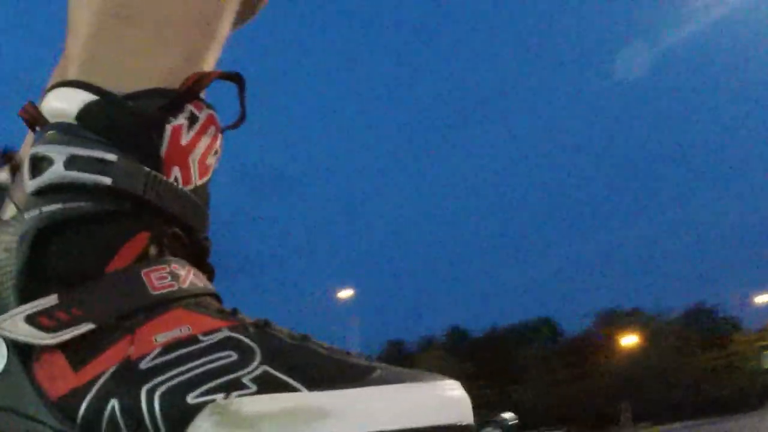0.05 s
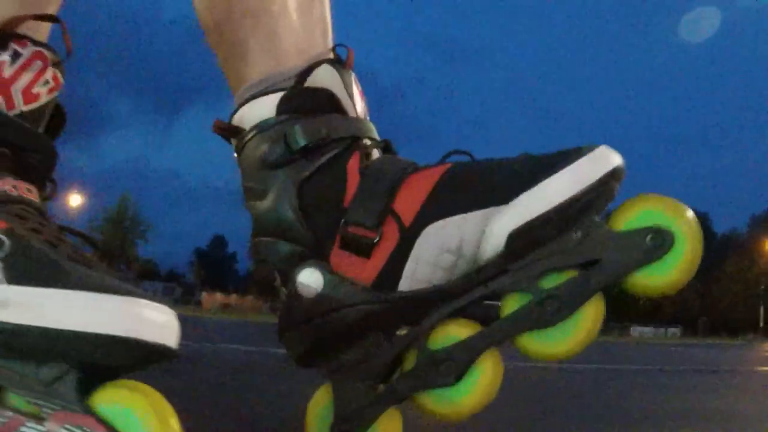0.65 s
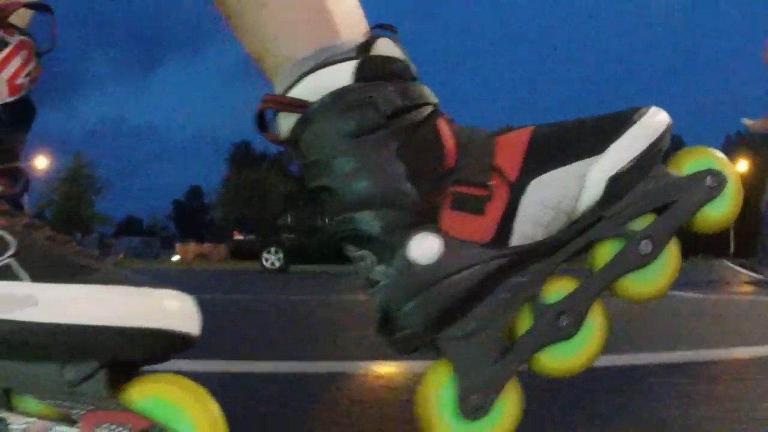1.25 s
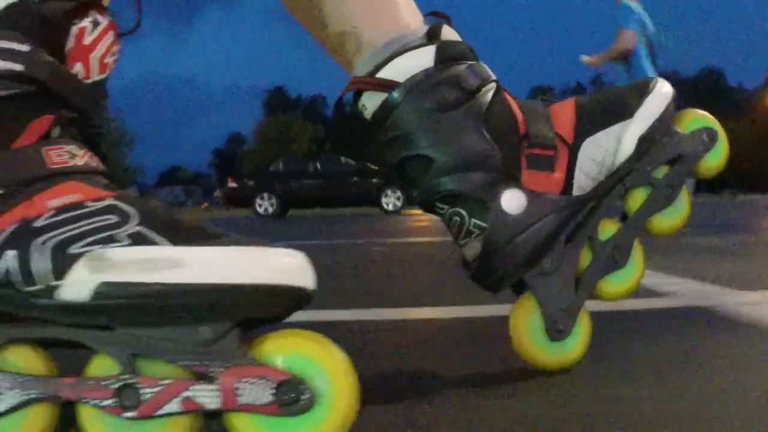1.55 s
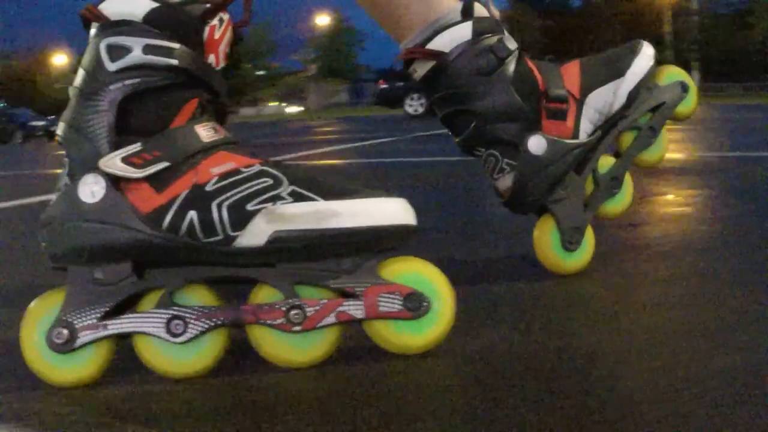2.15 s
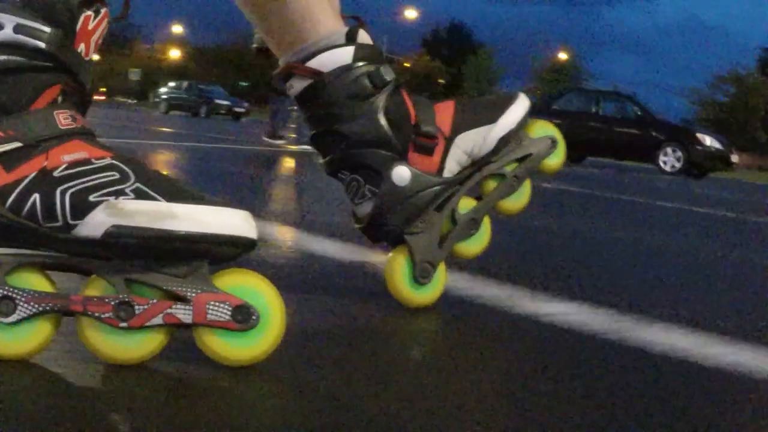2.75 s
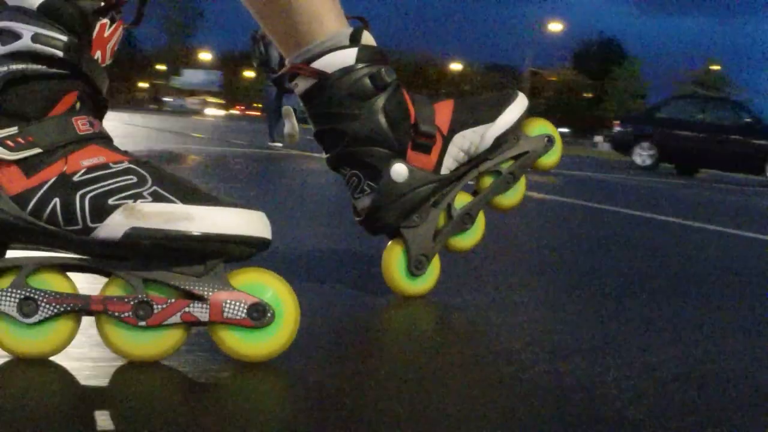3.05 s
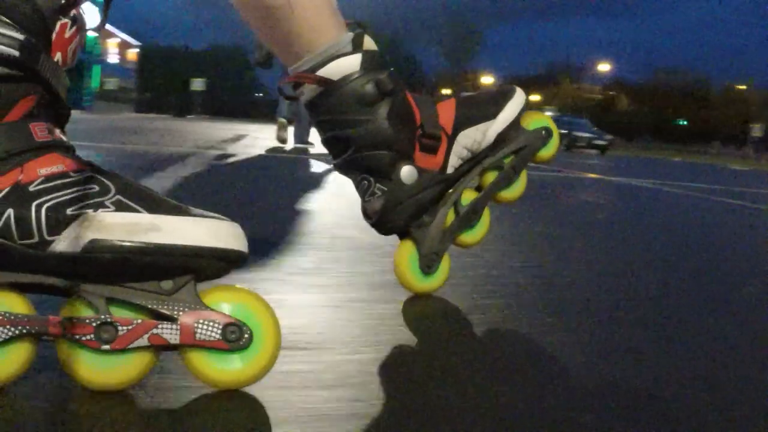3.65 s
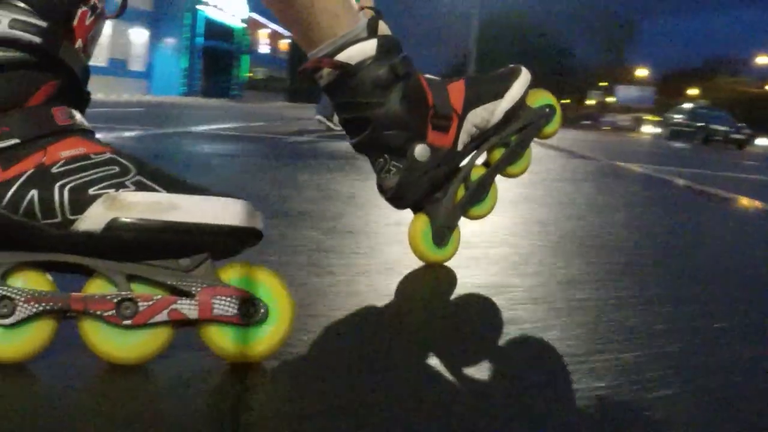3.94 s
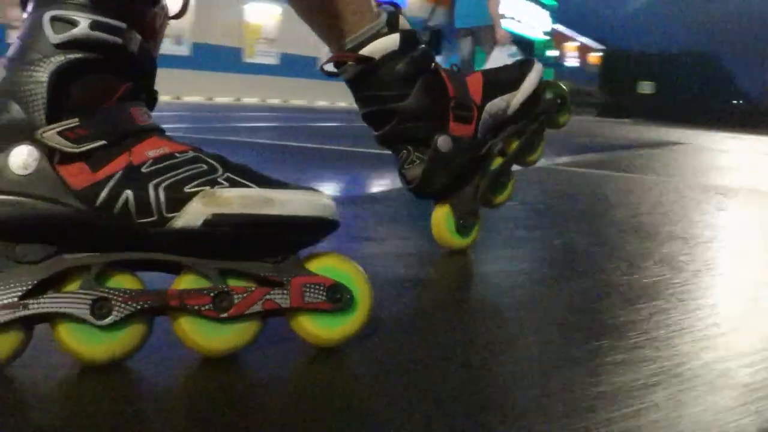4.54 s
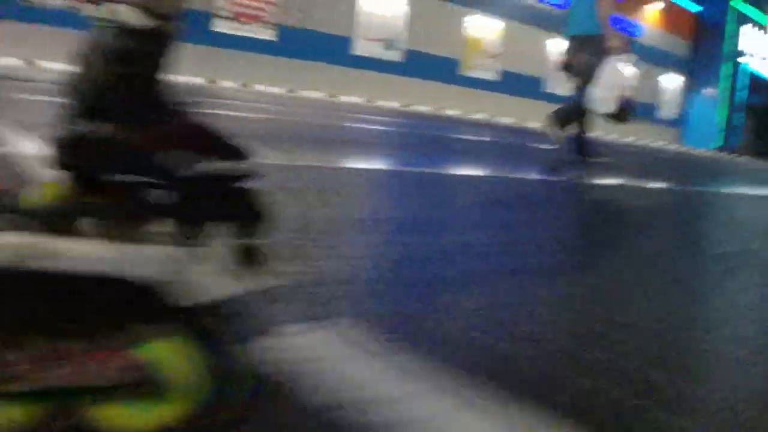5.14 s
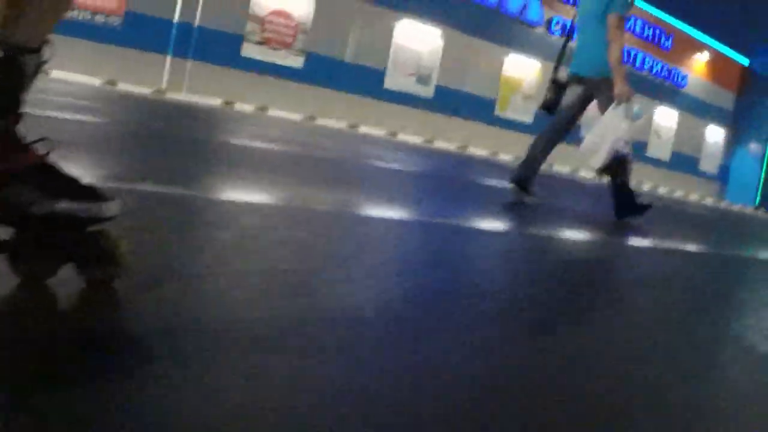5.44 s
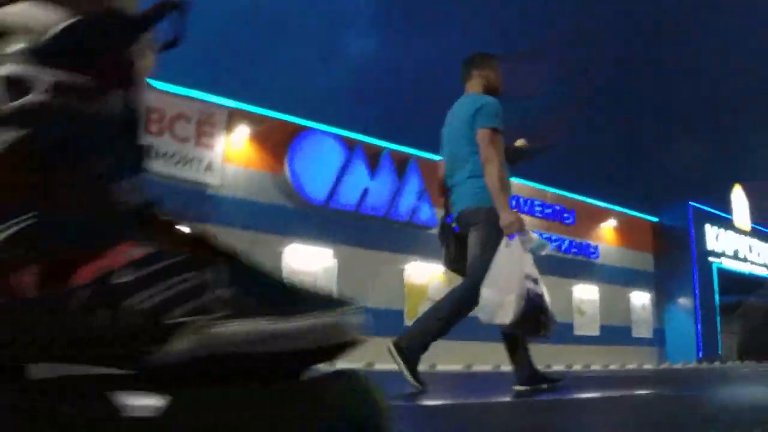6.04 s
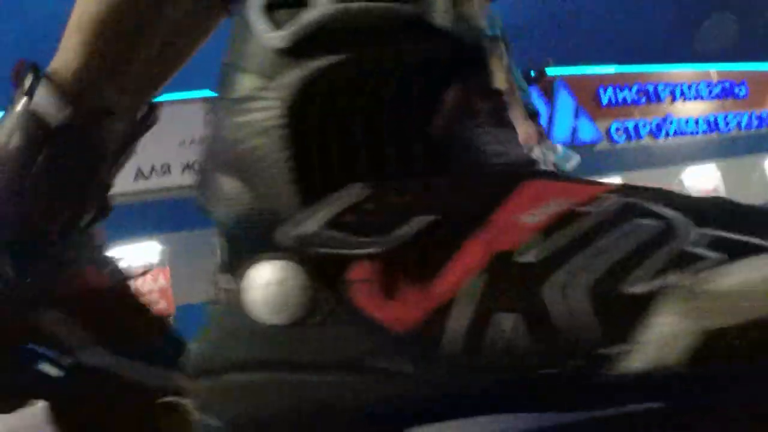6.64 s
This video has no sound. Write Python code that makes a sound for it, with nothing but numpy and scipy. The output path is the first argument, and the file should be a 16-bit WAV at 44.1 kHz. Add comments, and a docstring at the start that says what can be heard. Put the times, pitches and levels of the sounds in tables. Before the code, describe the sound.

Inline skates coast across wet asphalt, heard from a microphone on a pole just above the ground. The wheels make a gritty roar and a steady watery hiss with small splashes, while dull knocks come through the pole. About halfway, a low boom and wavering hum swell. A faint pulsing rub leads to a sharp, rattling clack, and another clack comes near the end. Traffic murmurs faintly far away.

```python
"""A wet asphalt road, heard from a camera on a pole just above the ground: inline skates coast along.
Grit makes the wheels roar; they hum, whirr and peel off a hiss of water with small splashes, and one
rubs in the turn. The road shakes the pole, which booms at its low modes and clacks and rattles when
it is jolted. Traffic murmurs far away."""
import sys
import numpy as np
from scipy import signal
from scipy.fft import rfft, irfft
from scipy.io import wavfile
from scipy.ndimage import uniform_filter1d

SR = 44100
rng = np.random.default_rng(int(sys.argv[2]) if len(sys.argv) > 2 else 0)


def persist_wave(psi):
    """Save psi, clipped to +-1, as 16-bit WAV."""
    counts = np.round(np.clip(psi, -1, 1) * 32767).astype(np.int16)
    wavfile.write(sys.argv[1], SR, np.atleast_2d(counts).T)


N = 299439
TIME = np.arange(N) / SR

# fader rides for the rolling wheels, ahead of their trims: t/s, roar/dB, water hiss/dB, fine mist/dB
ROLL_LEVELS = [(0, -54, -55.5, -70), (.35, -56, -59.5, -72), (.7, -57, -58.5, -76),
               (1.4, -56.5, -58.5, -73), (2.4, -58, -58.5, -77), (3.3, -58.5, -62.5, -76.5),
               (4.35, -57.5, -59, -70), (4.8, -55.5, -63, -77), (5.22, -55.5, -61, -77),
               (5.38, -58, -67.5, -78), (6, -57, -67, -80.5), (6.42, -54, -62.5, -73),
               (6.79, -51, -64, -75)]
# EQ of plastic hitting plastic: f/Hz, level/dB
CLACK_EQ = [(200, -6), (420, 7), (600, 4.5), (1050, -8), (1500, 7), (2600, 8.5), (3050, -24.5),
            (4200, -19.5), (5200, -7.5), (6500, -31), (15000, -57)]


def undb(db):
    """Decibels to gain."""
    return 10 ** (np.asarray(db) / 20)


def unit(x):
    """Scale to rms 1."""
    return x / np.sqrt(np.mean(x ** 2))


def curves(rows):
    """Each column of a table, joined by straight lines in time."""
    times, *columns = np.transpose(rows)
    return [np.interp(TIME, times, column) for column in columns]


def noise():
    """White noise."""
    return rng.standard_normal(N)


def walk(rate):
    """Random drift that turns about rate times a second; rms 1."""
    step = int(SR / rate)
    held = np.repeat(rng.uniform(-1.1, 1, N // step + 1), step)
    return unit(uniform_filter1d(held, step)[:N])


def grains(rate, spread_db):
    """Random clicks of uneven size, about rate a second; rms 1."""
    size = undb(spread_db * np.minimum(rng.exponential(size=N), 6))
    return unit((rng.random(N) < rate / SR) * size * noise())


def colour(x, eq, size=4096):
    """Minimum-phase EQ through (f/Hz, level/dB) points; white noise keeps its level."""
    hz, db = np.transpose(eq)
    bin_hz = np.arange(size // 2 + 1) * SR / size
    log_gain = np.log(undb(np.interp(np.log(bin_hz + 1), np.log(hz), db)))
    cepstrum = irfft(log_gain)[:size // 2]
    cepstrum[1:] *= 2
    response = irfft(np.exp(rfft(cepstrum, size)))
    return signal.fftconvolve(x, response / np.linalg.norm(response))[:N]


def resonate(x, hz, width_hz):
    """A resonance applied twice, for steep skirts; rms 1."""
    b, a = signal.iirpeak(hz, hz / width_hz, fs=SR)
    return unit(signal.lfilter(b, a, signal.lfilter(b, a, x)))


def even(x, span_s):
    """A leveller: holds the signal near rms 1 over spans of this length."""
    span = int(span_s * SR)
    power = uniform_filter1d(uniform_filter1d(x ** 2, span), span)
    return x / np.sqrt(power + 1e-9)


def add(out, start_s, x):
    """Mix in a one-shot at start_s."""
    i = int(start_s * SR)
    out[i:i + len(x)] += x[:max(N - i, 0)]


def gliding_band(hz, db, width_hz):
    """A narrow, fluttering band of noise that follows a pitch curve and a level curve."""
    flutter = unit(signal.sosfilt(signal.butter(2, width_hz / 2, fs=SR, output="sos"), noise()))
    return np.sqrt(2) * flutter * np.sin(2 * np.pi * np.cumsum(hz) / SR) * undb(db)


def rolling(roar_trim_db=2, hiss_trim_db=1, mist_trim_db=2, patchy_db=0.82, grit_db=0.95):
    """Grit drums on the wheels, and the water film tears off them in countless droplets."""
    # EQs of the grit's roar, the water's hiss and the airy mist: f/Hz, level/dB
    roar_eq = [(110, -2.5), (150, -27.5), (210, -0.5), (300, -1), (390, -3.5), (500, 2), (620, -2.5),
               (900, -8.5), (1300, -7.5), (2000, -8.5), (2600, -12.5), (3100, -19.5), (6000, -50)]
    hiss_eq = [(1000, -18), (1900, -0.5), (2450, 0), (2900, -1), (3600, -1), (4200, -1), (5200, -1),
               (5900, -2), (6500, -6), (7100, -9.5), (8500, -15), (11000, -25), (15000, -30)]
    mist_eq = [(6000, -8), (8500, 0), (10000, 3), (11400, 0), (13000, 0.5), (15000, -8)]
    roar_db, hiss_db, mist_db = curves(ROLL_LEVELS)
    wetness_db = patchy_db * walk(30)
    roar = colour(grains(rate=9000, spread_db=-1), roar_eq)
    roar *= undb(roar_db + roar_trim_db + grit_db * walk(22))
    hiss = colour(grains(rate=16000, spread_db=2.5), hiss_eq) * undb(hiss_db + hiss_trim_db + wetness_db)
    mist = colour(grains(rate=18000, spread_db=3.5), mist_eq) * undb(mist_db + mist_trim_db + wetness_db)
    return roar + ground_bounce(hiss + mist)


def ground_bounce(spray, delay_s=0.000397, fade_s=3.7):
    """The hiss reflects off the wet ground: a comb filter that weakens along the way."""
    share = 0.33 * np.exp(-TIME / fade_s)
    echo = np.interp(TIME - delay_s, TIME, spray)
    return (spray + share * echo) / np.hypot(1, share)


def wheel_whirr(hz=2523, sag_hz_per_s=55, db=-56, fade_db_per_s=4):
    """A narrow resonance of the wet wheels sinks and fades as the skate coasts."""
    return gliding_band(hz - sag_hz_per_s * TIME, db - fade_db_per_s * TIME, width_hz=330)


def sizzle():
    """The sharpest edge of the spray, drifting in pitch and level."""
    # path of the spray's bright band: t/s, centre f/Hz, level/dB
    sizzle_path = [(0, 7200, -67), (.75, 7120, -75), (1, 5600, -84), (1.35, 5780, -69), (2.7, 6250, -68),
                   (3.3, 6430, -78), (4.3, 6620, -69.5), (6, 7100, -82), (6.79, 7330, -66.5)]
    return gliding_band(*curves(sizzle_path), width_hz=890)


def rumble(boom_trim_db=-.5, hum_trim_db=-1, flutter_trim_db=-10, judder_hz=14):
    """Road bumps keep the pole swaying and booming in uneven judders; the wheels add a wavering hum."""
    # how hard the road shakes the pole: t/s, slow sway/dB, boom ahead of its trim/dB
    pole_shake = [(0, -37, -39), (.45, -54, -49.5), (.87, -45, -47.5), (1.25, -59, -53.5), (1.47, -41, -51),
                  (1.95, -49, -48), (2.85, -43, -46.5), (3.07, -46, -44), (3.25, -39, -27),
                  (3.56, -47, -29), (3.68, -41, -33.5), (4.3, -44, -38), (5.15, -50, -33.5),
                  (5.5, -33, -44.5), (5.85, -48, -41), (6.12, -34.5, -35), (6.42, -38.5, -46.5),
                  (6.79, -36, -33)]
    # the wheels hum louder as the skates lean into the turn: t/s, f/Hz, level ahead of the trims/dB
    wheel_hum = [(0, 108.7, -55), (1.3, 106.4, -63.5), (2.7, 111.2, -60), (2.95, 108, -47),
                 (3.25, 77.1, -39), (3.6, 79.8, -43.5), (3.95, 104.3, -44), (4.25, 86, -44), (4.9, 94, -31),
                 (5.15, 95.3, -44.5), (5.45, 96, -39.5), (5.62, 113.3, -35.5), (5.8, 103.3, -37.5),
                 (5.98, 100.5, -49), (6.35, 97.3, -42), (6.52, 96, -34), (6.79, 104.2, -34.5)]
    sway_db, boom_db = curves(pole_shake)
    hum_hz, wheel_db = curves(wheel_hum)
    judder_db = 3 * walk(judder_hz)
    sway = even(resonate(noise(), hz=26.1, width_hz=6.8), span_s=0.048)
    boom = even(resonate(noise(), hz=70, width_hz=11), span_s=0.06)
    pole = undb(sway_db) * sway + undb(boom_db + boom_trim_db + judder_db) * boom
    wavering_hz = hum_hz * (1 + .012 * walk(20))
    hum = np.sqrt(2) * np.sin(2 * np.pi * np.cumsum(wavering_hz) / SR)
    flutter = even(resonate(noise(), hz=106.5, width_hz=36), span_s=0.1)
    waver_db = 2 * walk(judder_hz)
    wheels = undb(hum_trim_db + waver_db) * hum + undb(flutter_trim_db + judder_db) * flutter
    return pole + undb(wheel_db) * wheels


def traffic(db=-54, swell_db=-2):
    """A dull, slowly swelling bed of far cars."""
    # EQ of distant traffic: f/Hz, level/dB
    traffic_eq = [(25, -33), (50, 0.5), (120, -4.5), (300, -16), (1000, -25), (3000, -33), (8000, -48)]
    return colour(noise(), traffic_eq) * undb(db + swell_db * walk(0.96))


def housing(x):
    """Airborne sound reaches the microphone through the ringing camera shell."""
    # narrow resonances of the shell: f/Hz, width/Hz, boost/dB
    shell_peaks = [(1990, 48, 1.5), (4210, 100, 5.5), (4960, 79, 4.5), (5490, 100, 6.5)]
    for hz, width_hz, db in shell_peaks:
        x = x + (undb(db) - 1) * signal.lfilter(*signal.iirpeak(hz, hz / width_hz, fs=SR), x)
    return x


def mount_ring(contact_hz, bend_db, clamp_db, shell_db):
    """One blow rings the bending pole, the clamp and the shell; a soft contact dulls the high modes."""
    # modes of the pole and camera mount: f/Hz, level/dB, t60/s
    mount_modes = [(65.6, -13.5, 0.52), (114, -11.5, 0.14), (204.3, -12, 0.096), (240, -11, 0.043),
                   (271, -22, 0.13), (332, -22, 0.066), (397, -12, 0.03), (499, -4.5, 0.065),
                   (613, -18, 0.044), (717, -17.5, 0.0646), (938, -28.5, .065), (1058, -26, 0.038),
                   (1333, -16.5, 0.038), (1404, -14, 0.032), (1585, -22, 0.03), (1745, -28, 0.033),
                   (1810, -23, 0.064), (2007, -28, 0.077), (2140, -27.5, 0.049), (2410, -20.5, 0.043),
                   (2690, -23.5, 0.045), (2783, -28.5, 0.043), (3360, -37.5, 0.03), (4750, -34.5, 0.038),
                   (5340, -53, 0.033)]
    t = TIME[:SR // 2]
    out = np.zeros(len(t))
    for k, (hz, db, t60) in enumerate(mount_modes):
        part_db = bend_db * (hz < 160) + clamp_db * (160 <= hz < 300) + shell_db * (hz > 580)
        gain = undb(db + part_db) / np.hypot(1, (hz / contact_hz) ** 2)
        decay = np.exp(-np.log(1000) * t / t60)
        out += (-1) ** k * gain * np.sin(2 * np.pi * hz * t) * decay
    return out


def knocks(crack_db=-17, crack_s=0.0019, hard_hz=3500):
    """Each jolt rings the mount; hard ones also crack as the plastic parts meet."""
    # jolts of the pole: t/s, level/dB, contact cut-off/Hz, then boosts: bend/dB, clamp/dB, shell/dB
    jolts = [(0.05, -13, 160, 2, 3, 8.5), (0.143, -22.5, 75, 3.5, -4, 4), (.427, -21.5, 1000, 7, -6, 7.5),
             (.567, -27, 80.2, 6, 0, 0), (1.544, -34.5, 200, 7, -3, 0), (1.797, -37.5, 250, 11, -2, -1),
             (1.908, -32, 247, -0.5, 4, 2), (2.079, -34.5, 250, 5.5, -2, -2),
             (2.282, -33.5, 250, 10, 0, -2), (2.391, -33, 250, 7.5, -3, 0), (2.831, -34.5, 200, 8.5, 0, 0),
             (2.914, -31.5, 251, 3, -3, 1.5), (3.971, -32, 250, 4.5, 2.5, 0),
             (5.2056, -18, 2630, -1.5, -1, -4), (5.2327, -4, 5950, 4, 4, 2.5),
             (6.442, -33.5, 700, -11, 6, 2), (6.6336, -18, 2363, 9.5, 2, 13),
             (6.698, -16, 100, 8.5, -2, -9)]
    ringing, crack_envelope = np.zeros(N), np.zeros(N)
    age = TIME[:SR // 10] / crack_s
    for start_s, db, contact_hz, bend_db, clamp_db, shell_db in jolts:
        add(ringing, start_s, undb(db) * mount_ring(contact_hz, bend_db, clamp_db, shell_db))
        hardness = min(contact_hz / hard_hz, 1)
        add(crack_envelope, start_s, undb(db + shell_db) * hardness * age * np.exp(1 - age))
    return ringing + undb(crack_db) * colour(crack_envelope * noise(), CLACK_EQ)


def stray_drops(per_s=4, over_hiss_db=14.5, spread_db=2, decay_s=0.0055, low_cut_hz=5000):
    """Cues for drops flicked off the wheels at random, louder where the road is wetter."""
    _, hiss_db, _ = curves(ROLL_LEVELS)
    drops = []
    for when, size in rng.random((int(per_s * N / SR), 2)):
        db = hiss_db[int(when * N)] + over_hiss_db + spread_db * (2 * size - 1)
        drops.append((when * N / SR, db, decay_s, low_cut_hz))
    return drops


def splashes(attack_s=0.00031):
    """Puddles and stray drops make short, dense bursts of droplets; a low cut thins the small ones."""
    # wheels slap through puddles: t/s, level ahead of the low cut/dB, decay/s, low cut/Hz
    puddles = [(0.467, -47.5, 0.032, 2000), (0.486, -46, 0.019, 2400), (0.65, -43.5, 0.019, 3800),
               (1.254, -42.5, 0.0073, 3450), (1.564, -39, 0.011, 3130), (1.946, -39.5, 0.0039, 4180),
               (2.698, -41, 0.019, 4200), (2.833, -36, 0.0041, 4500), (3.641, -40, 0.0064, 4200),
               (4.758, -31, 0.0043, 8070), (4.975, -41.5, 0.0094, 3760), (5.664, -32.5, 0.0059, 7000),
               (5.666, -49.5, 0.059, 3030), (5.745, -44.5, 0.0066, 3470), (5.841, -42, 0.0044, 4160),
               (6.242, -46.5, 0.012, 2976), (6.355, -49, 0.043, 2397), (6.44, -47.5, 0.0056, 2420)]
    # EQ of splashing water: f/Hz, level/dB
    splash_eq = [(1200, -14), (2500, 19.5), (3500, 1.5), (4300, 2), (5500, 4.5), (7000, -4.5), (9000, -21),
                 (15000, -21)]
    out, t = np.zeros(N), TIME[:SR // 5]
    droplets = even(colour(noise(), splash_eq), span_s=0.0019)
    for start_s, db, decay_s, low_cut_hz in puddles + stray_drops():
        envelope = (1 - np.exp(-t / attack_s)) * np.exp(-t / decay_s)
        burst = np.roll(droplets, -int(start_s * SR))[:len(t)] * envelope
        low_cut = signal.butter(4, low_cut_hz, "high", fs=SR, output="sos")
        add(out, start_s, undb(db) * signal.sosfilt(low_cut, burst))
    return out


def wheel_rub(peak_s=5.196, peak_db=-47.5, rise_db_per_s=15, fall_db_per_s=39):
    """One wheel rubs faintly once a revolution, growing into the turn and dying after it."""
    revolution_s, contact_s = 0.1455, 0.02
    since_peak = TIME - peak_s
    off_contact = (since_peak + revolution_s / 2) % revolution_s - revolution_s / 2
    gate = np.cos(np.pi * np.clip(off_contact / contact_s, -.5, .5)) ** 2
    db = peak_db + np.minimum(rise_db_per_s * since_peak, -fall_db_per_s * since_peak)
    return gate * undb(db) * even(resonate(noise(), hz=1600, width_hz=280), span_s=0.019)


def rattles(buzz_db=-6, fade_db=5):
    """Tiny repeated contacts buzz in the loose mount and weaken as the pole's swing dies."""
    # chatter after hard jolts: t/s, level/dB, length/s
    chatter = [(5.21, -38.5, 0.046), (5.226, -39, 0.11), (6.667, -46.5, 0.099)]
    gate = np.zeros(N)
    for start_s, db, length_s in chatter:
        n = int(length_s * SR)
        fade = undb(db + fade_db * np.linspace(.5, -.5, n))
        add(gate, start_s, fade * signal.windows.tukey(n, .5))
    contacts = gate * grains(rate=2000, spread_db=0)
    body = mount_ring(contact_hz=6600, bend_db=-22, clamp_db=0, shell_db=3)
    ringing = signal.fftconvolve(contacts, body / np.linalg.norm(body))[:N]
    return ringing + undb(buzz_db) * colour(contacts, CLACK_EQ)


def scene():
    """The mono mix: skates and traffic come through the housing, the pole's noises go straight in."""
    skates = wheel_whirr() + sizzle() + rolling() + splashes() + wheel_rub()
    pole = rumble() + knocks() + rattles()
    return (housing(skates + traffic()) + pole)[None]


def record(dry):
    """The camera cuts the top end steeply."""
    top_hz = 15300
    return signal.sosfilt(signal.ellip(10, .2, 80, top_hz, fs=SR, output="sos"), dry)


dry = scene()
out = record(dry)
persist_wave(out)
```